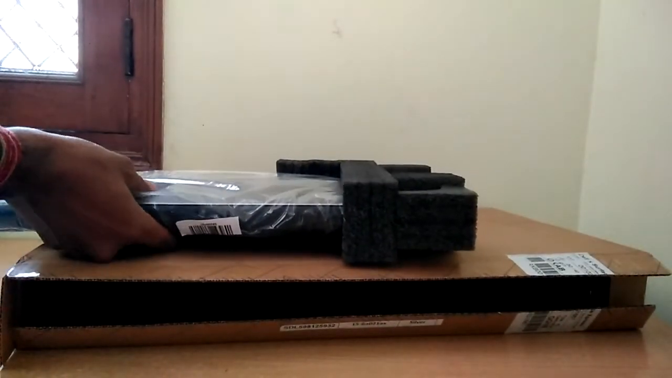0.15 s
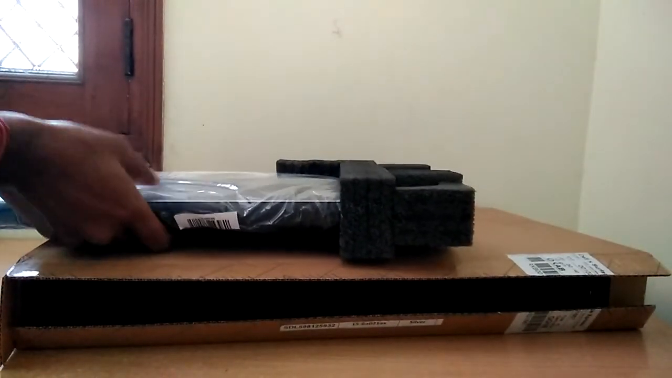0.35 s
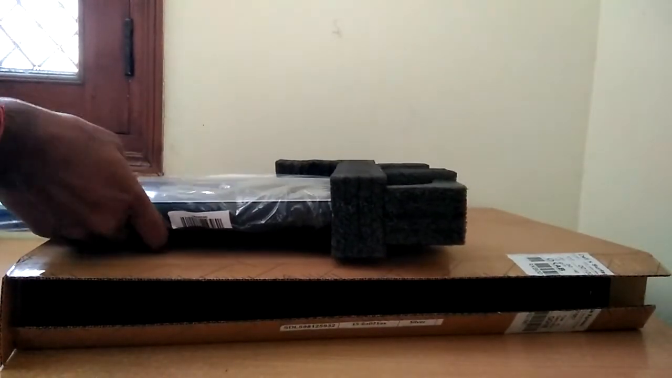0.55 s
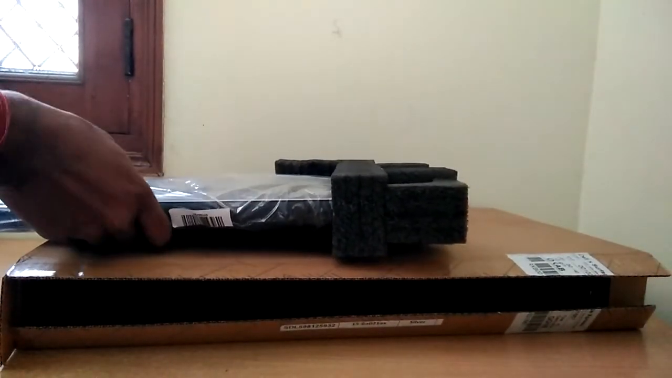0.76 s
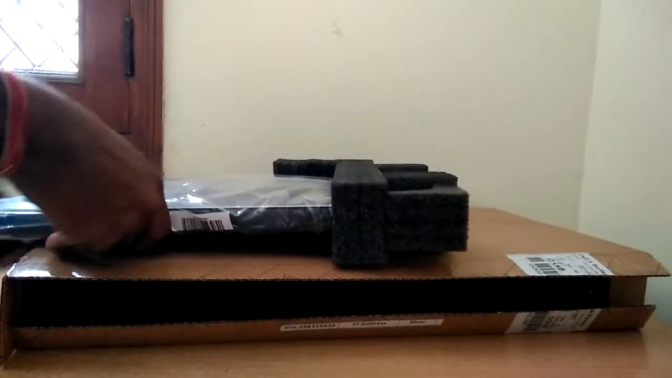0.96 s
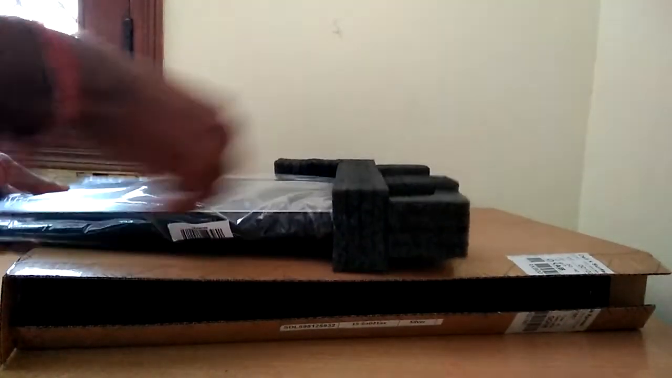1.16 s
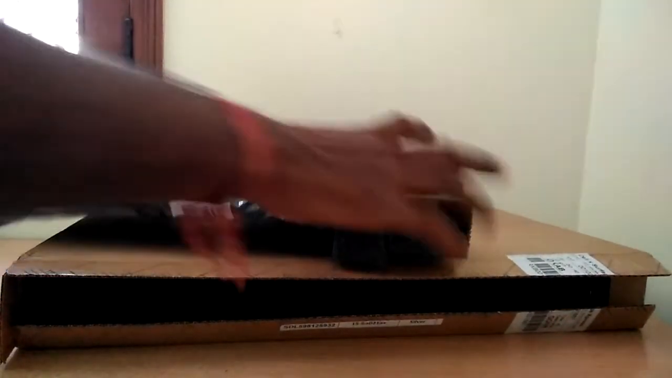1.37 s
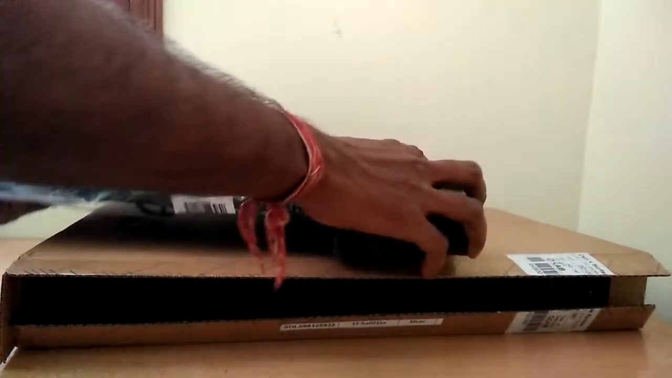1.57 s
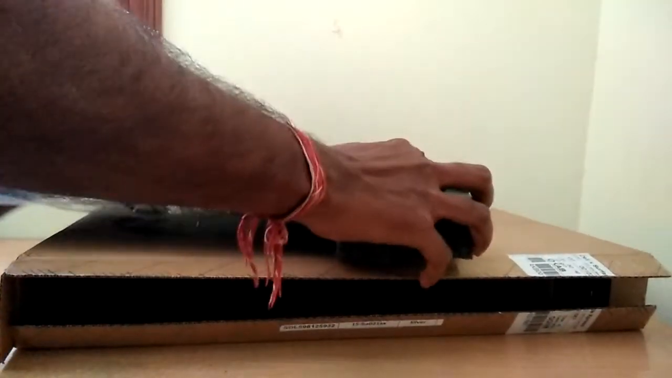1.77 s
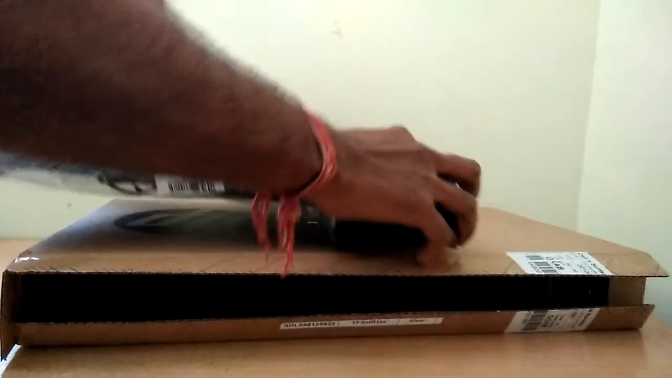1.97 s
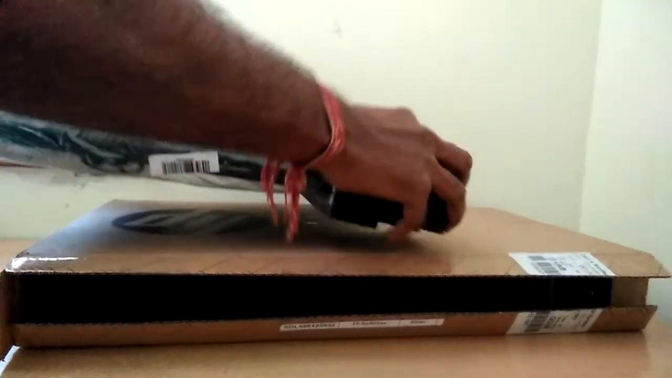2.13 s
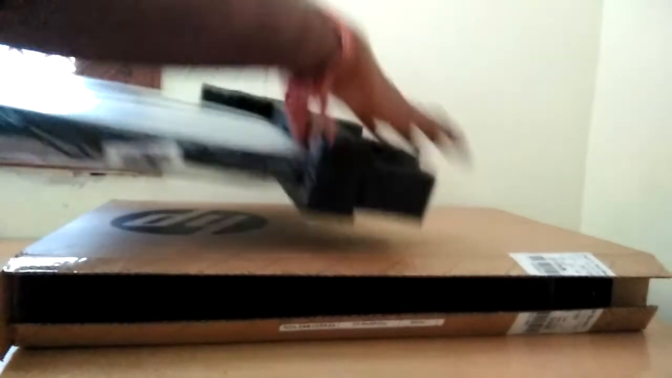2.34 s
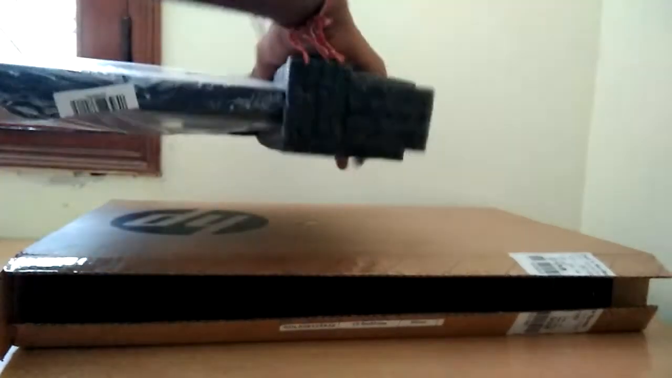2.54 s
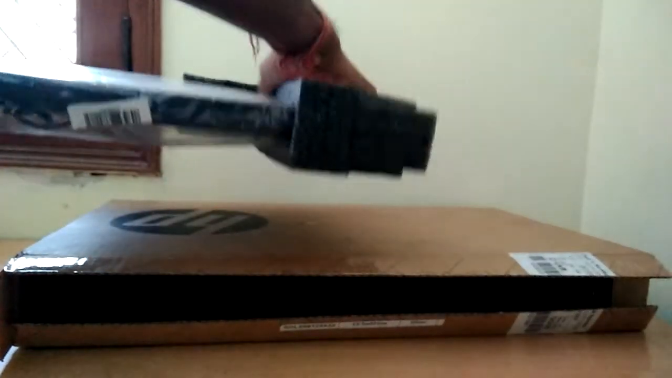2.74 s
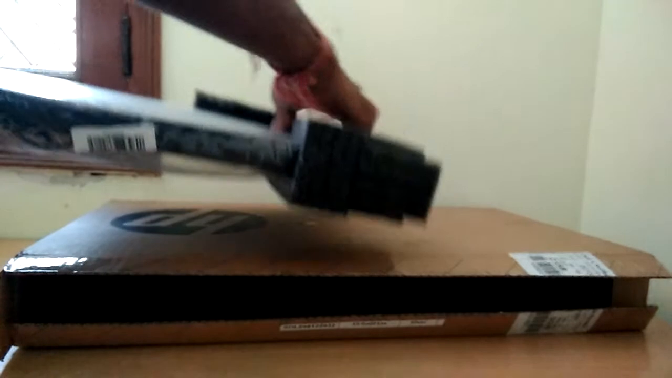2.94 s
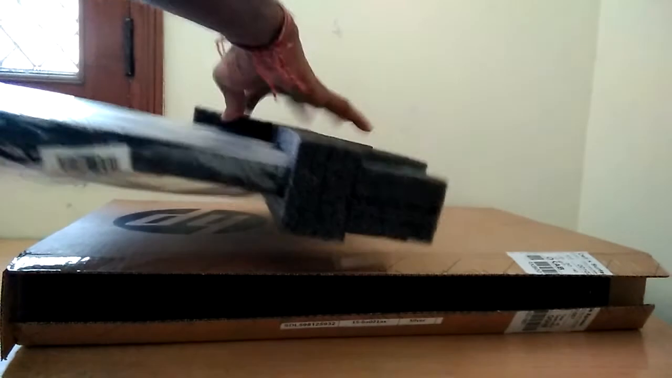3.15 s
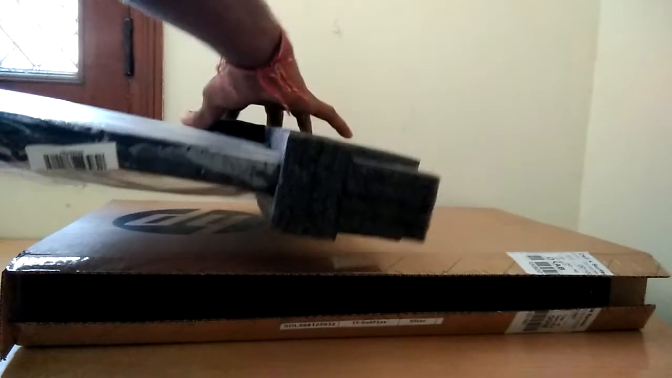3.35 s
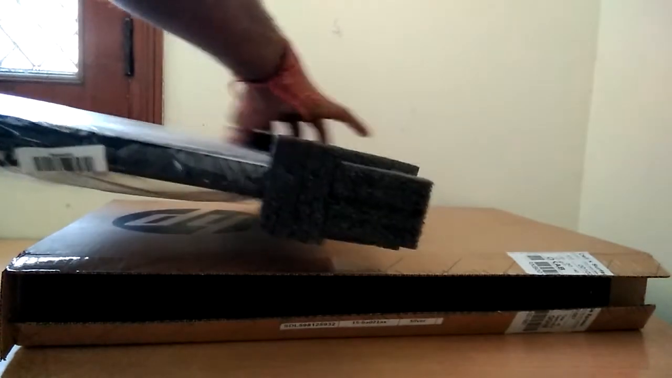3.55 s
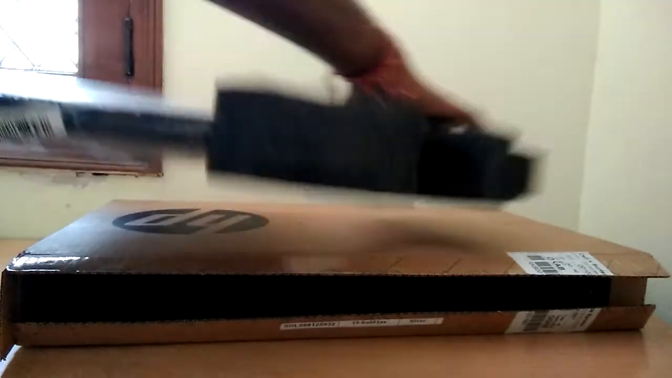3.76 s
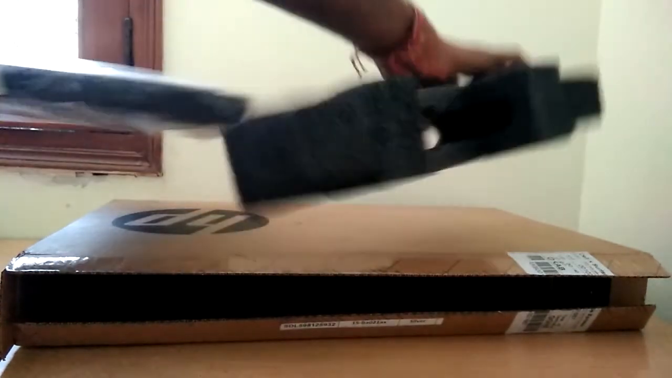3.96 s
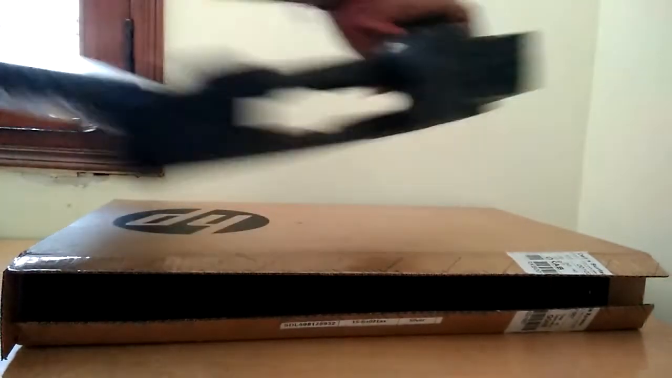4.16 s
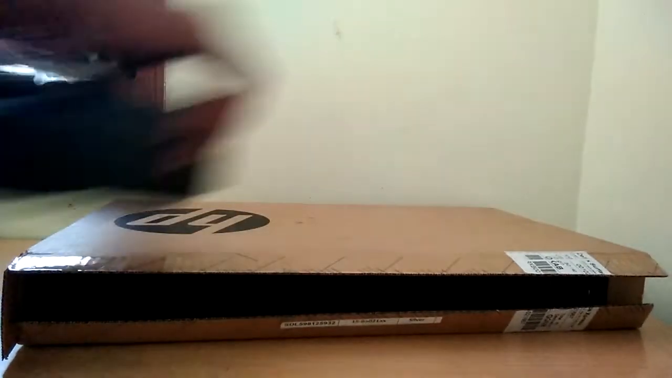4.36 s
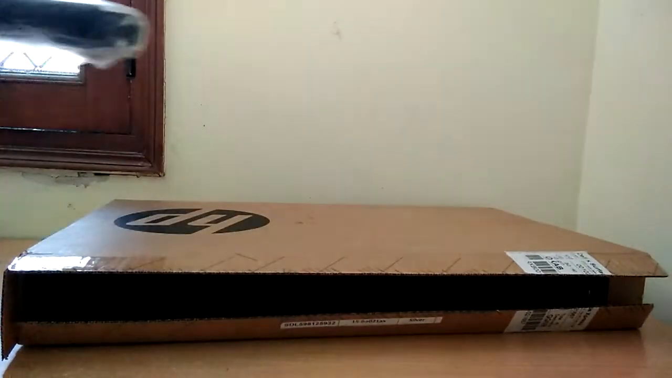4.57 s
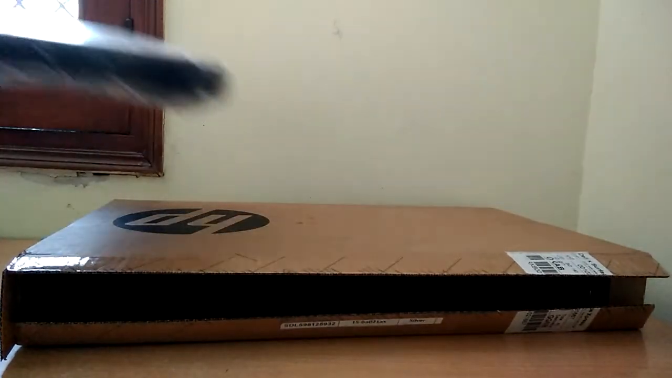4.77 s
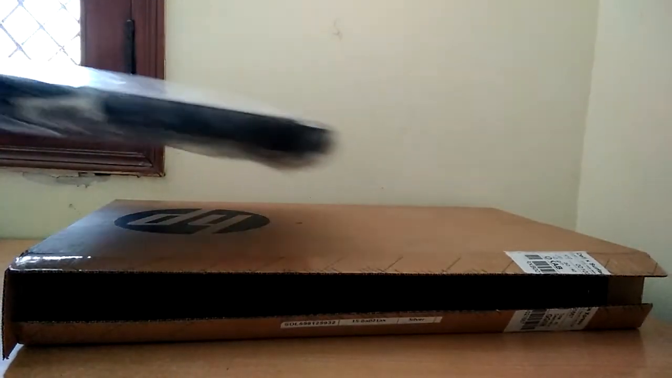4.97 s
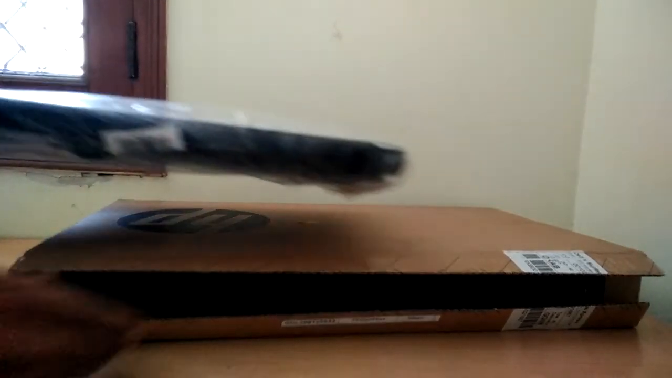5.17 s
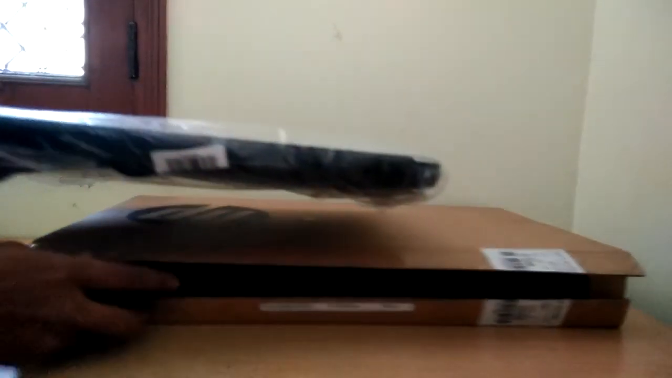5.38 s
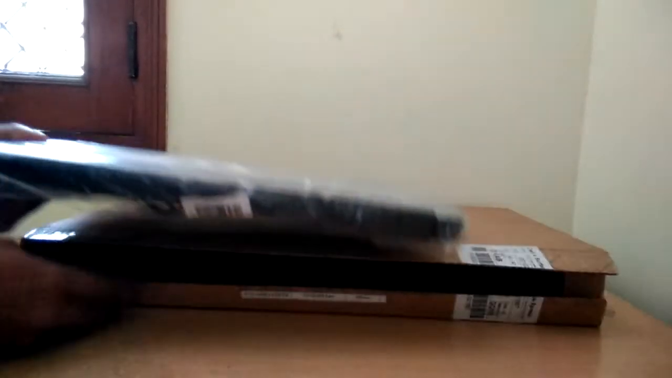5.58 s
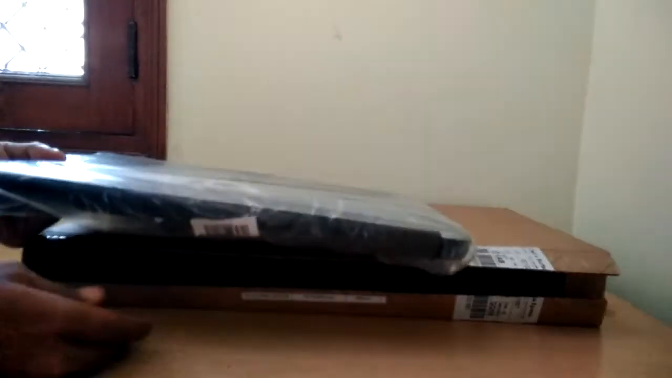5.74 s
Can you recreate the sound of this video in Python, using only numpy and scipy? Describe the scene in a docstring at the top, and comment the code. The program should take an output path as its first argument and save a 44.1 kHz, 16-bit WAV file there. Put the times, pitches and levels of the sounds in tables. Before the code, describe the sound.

Close indoor unpacking: irregular plastic rustling, sharp crease clicks, rough foam slips, soft cardboard bumps, and a hollow thump near the end.

```python
"""Unpacking a sleeved device

A flat device in a plastic sleeve is handled on its cardboard box in a small room, over a faint hush.
Film and foam rub by stick-slip friction, modelled as clumped noise grains; buckling creases snap and ring.
Taps excite the lid's resonances, brushes are dulled friction noise, and the shifting load rumbles.
A foam end cap scrapes off in short slips, the freed shell rings faintly as filtered noise,
and at last the device is set down with a thud, a sum of decaying modes of the hollow box."""
import sys
import numpy as np
from scipy import signal
from scipy.fft import rfft, irfft, next_fast_len
from scipy.io import wavfile
from scipy.ndimage import uniform_filter1d, map_coordinates

SR = 44100
rng = np.random.default_rng(int(sys.argv[2]) if len(sys.argv) > 2 else 0)


def log_audio(samples):
    """Write samples as a 16-bit WAV file to the path given in sys.argv[1]."""
    # one column per channel
    frames = np.atleast_2d(samples).T
    # limit to full scale, then quantise
    limited = np.clip(frames, -1, 1)
    pcm = np.round(limited * 32767).astype(np.int16)
    wavfile.write(sys.argv[1], SR, pcm)


N = 256220
TOP_HZ = 14500  # upper band limit

# Levels in the tables are relative: the layers apply their own gains as well.
# background hush: (frequency [Hz], spectral level [dB])
HUSH_SPECTRUM = [(20, -7), (60, 22), (150, 6.5), (400, -16.5), (1000, -5.5), (3000, -72), (6000, -55.5),
                 (14000, -14.5)]
# decay of the room's diffuse tail: (frequency [Hz], T60 [s])
ROOM_DECAY = [(100, 0.5), (500, 0.87), (2000, 0.52), (6000, 0.18), (14000, 0.54)]
# stereo width, gain of the side signal: (frequency [Hz], gain [dB])
SIDE_GAIN = [(2800, -71), (4000, -53), (5500, -24), (7500, -5.5), (10000, -4), (14000, -4.5)]

# the load is shoved across the box and judders: (time [s], length [s], level [dB])
SHOVES = [(0, .01, -41.5), (0.232, 0.087, -43), (0.396, 0.21, -44), (1.05, 0.26, -43.5),
          (1.395, 0.047, -45), (1.707, 0.035, -44), (2.18, 0.048, -42), (3.584, 0.062, -47),
          (4.06, .15, -47.5), (4.85, 0.084, -39.5), (5.02, 0.05, -37.5), (5.317, 0.053, -41),
          (5.438, 0.3, -48)]
# juddering of the load: (frequency [Hz], spectral level [dB])
RUMBLE_SPECTRUM = [(20, -46), (35, -8), (52, -0.5), (85, 4), (120, 2.5), (165, -4), (230, -4.5), (320, -13),
                   (600, -27), (1500, -42)]
SHOVE_RISE_S, SHOVE_T60_S = 0.021, 0.39
CARRY_DB = -53  # merely holding the load, on the scale of the shoves

# the load bumps the hollow box: (time [s], boom level [dB], contact level [dB], firmness [Hz])
BUMPS = [(.236, -17.5, -66, 70), (1.151, -24.5, -42, 140), (1.725, -44, -48.5, 72), (2.186, -43, -57, 70),
         (3.683, -44, -36, 250), (4.198, -33, -64, 70), (4.312, -19, -67, 60), (5.609, -9, -23, 490),
         (5.672, -33, -34.5, 400), (5.777, -22.5, -45, 200)]
# modes of the box on its table: (frequency [Hz], level [dB], T60 [s])
BOX_MODES = [(60, -15, .25), (89, -11, 0.32), (116, -5.5, 0.28), (140, -12, 0.54), (179.8, -12, 0.42),
             (227, -15, 0.34), (281, -19.5, 0.73), (402.7, -22, 0.38)]
# crushing noise of the contact: (frequency [Hz], spectral level [dB])
CONTACT_SPECTRUM = [(40, -15), (90, -9.5), (170, 14), (400, -1.5), (900, -3.5), (1600, -13), (3500, -15),
                    (8000, -30), (14000, -32)]

# fingers and corners tap the lid: (time [s], level [dB], pitch of the spot over the lid's own [ratio])
TAPS = [(0.487, -33, 0.86), (0.521, -31.5, 1.05), (0.625, -29.5, 1.07), (1.412, -25.5, 0.97),
        (1.84, -31, 0.88), (2.184, -36, 1.14), (2.8, -39, 1.8)]
# resonances of the lid: (frequency [Hz], width [Hz], level [dB])
LID_MODES = [(400, 100, 3.5), (786, 380, -2), (1170, 180, -1.5), (1580, 330, -16.5)]

# hands and corners brush the cardboard: (time [s], length [s], level [dB], dull above [Hz])
BRUSHES = [(0.231, 0.018, -38.5, 6000), (0.728, 0.36, -54, 1210), (1.139, 0.0071, -46, 3000),
           (1.145, 0.13, -43.5, 400), (1.952, 0.073, -45, 900), (2.189, 0.049, -47, 900),
           (2.988, .01, -51, 700), (4.83, 0.034, -41.5, 7000), (5.321, 0.0066, -41, 6000)]
# friction on cardboard: (frequency [Hz], spectral level [dB])
CARDBOARD_SPECTRUM = [(150, -8.5), (300, 1.5), (900, 0.5), (1700, -1), (2600, -8), (5000, -9.5),
                      (14000, -38)]

# resonances of the device's thin shell: (frequency [Hz], width [Hz], level [dB])
SHELL_MODES = [(1160, 73, -16.5), (1946, 140, 17), (3440, 90, 6)]
FREED_S = 4.24  # the shell is free of the foam

# creases in the film snap through: (time [s], level [dB], ring pitch [Hz], extra top end [dB])
SNAPS = [(0.156, -23.5, 5360, -6.5), (0.4703, -26, 5860, -2), (0.6036, -23.5, 6150, -1),
         (0.643, -27.5, 6000, 3), (0.7583, -31, 5870, 6), (0.8456, -25.5, 5860, -5),
         (0.883, -20.5, 5800, 3.5), (0.9413, -19, 5830, 2.5), (1.182, -26.5, 6330, -0.5),
         (1.2214, -25.5, 5770, -4), (1.309, -22.5, 5500, 1), (1.4115, -21, 6050, 5),
         (1.4266, -25, 5600, -2), (1.564, -24, 5540, -1), (2.177, -23.5, 5800, -8),
         (2.3085, -25.5, 5850, -4), (2.417, -25, 5700, 1.5), (3.0665, -17, 4750, 1),
         (3.14, -15.5, 5830, -3), (3.2641, -22.5, 4400, 0), (3.8996, -20.5, 5110, -1),
         (4.0698, -22.5, 6060, 4), (4.1944, -20, 5600, -1), (4.239, -24.5, 4970, -1.5),
         (4.8302, -20.5, 6010, -7), (5.4887, -24, 5700, 6)]
# a buckling crease: (frequency [Hz], spectral level [dB])
CRACK_SPECTRUM = [(1000, -23), (3200, -14), (4600, 3), (5800, 8.5), (8000, -8), (14000, -16)]
CRACK_HZ = 5630  # ring pitch of a crease of middling size
TOP_END_HZ = 7500  # crack spectrum points above this, before pitch scaling, take the extra top end
# the film settles after each snap; level relative to the snap's listed level
FLURRY_DB, FLURRY_RISE_S, FLURRY_T60_S = -26.5, 0.004, 0.37

# quick slips of foam over film: (time [s], rise [s], T60 [s], film level [dB], foam level [dB])
SLIPS = [(0.417, 0.0039, 0.07, -36.5, -60), (0.577, .008, 0.11, -40, -48),
         (1.344, 0.016, 0.14, -34.5, -38.5), (2.49, 0.0082, 0.065, -30, -43),
         (2.565, 0.0077, 0.2, -29, -41), (3.207, 0.0061, 0.14, -34, -43.5), (3.298, 0.01, 0.13, -50, -37.5),
         (3.322, 0.014, 0.092, -37, -45), (3.69, 0.0023, 0.07, -20.5, -29),
         (4.18, 0.016, 0.044, -34, -46.5), (4.236, 0.0066, 0.014, -26, -38),
         (4.248, 0.0033, 0.025, -29.5, -34), (4.307, 0.011, 0.065, -37, -38),
         (4.614, 0.019, 0.039, -28.5, -38), (4.658, 0.0135, 0.087, -35.5, -43),
         (4.826, 0.003, 0.068, -32.5, -29), (4.914, 0.0044, 0.095, -34, -45.5),
         (4.952, 0.0038, 0.042, -48, -36.5), (5.316, 0.0099, 0.096, -31.5, -37.5)]
# film and foam are dragged steadily: (time [s], rise [s], length [s], film level [dB], foam level [dB])
DRAGS = [(0, 0.0024, .02, -49, -59.5), (0.156, .01, 0.11, -54, -57.5), (0.354, .008, 0.17, -46, -53.5),
         (0.823, 0.017, 0.16, -44.5, -63), (1.062, 0.033, 0.047, -42, -49),
         (1.496, 0.013, 0.066, -38.5, -49), (1.65, 0.018, 0.079, -48, -50.5), (1.791, 0.18, 0.27, -35, -41),
         (2.17, 0.0089, 0.19, -43, -54), (2.366, 0.15, 0.25, -38, -44), (2.717, 0.017, 0.18, -47.5, -51.5),
         (2.924, 0.018, 0.058, -41, -47), (3.34, 0.029, 0.096, -50, -55), (3.444, 0.08, 0.25, -42.5, -52.5),
         (3.624, 0.059, 0.087, -29, -30.5), (3.72, 0.066, 0.28, -38.5, -42),
         (4.142, 0.0465, 0.19, -44.5, -51.5), (4.445, 0.022, 0.034, -56.5, -68),
         (4.621, 0.027, 0.13, -40, -44.5), (4.807, 0.016, 0.15, -46, -39), (4.995, .02, 0.037, -54, -49.5),
         (5.341, 0.034, 0.27, -40, -43.5), (5.739, 0.025, 0.051, -47.5, -53.5)]
DRAG_T60_S = 0.37  # a drag dies away once the hand stops
# while the foam cap is on, the gripped sleeve never quite rests
GRIP_FROM_S, GRIP_TO_S, GRIP_RISE_S, GRIP_T60_S = 0.14, 4.03, 0.3, 0.2
GRIP_FILM_DB, GRIP_FOAM_DB = -50.5, -55
# rubbing film: (frequency [Hz], spectral level [dB])
FILM_SPECTRUM = [(1200, -38.5), (2000, -19.5), (3000, -9), (4100, -0.5), (4700, -2), (5400, 3.5), (6100, 1),
                 (7000, -8), (8000, -12.5), (10000, -16.5), (14500, -21)]
# rubbing foam: (frequency [Hz], spectral level [dB])
FOAM_SPECTRUM = [(120, -19.5), (300, -0.5), (700, 3), (1200, 4.5), (1480, 0), (1800, 5.5), (2700, 6),
                 (4000, 5), (5500, 0.5), (8000, -23), (14000, -26.5)]
# the film's treble, higher when it is taut: (time [s], level [dB])
TAUTNESS = [(0, 3.5), (1.5, 4.5), (2.6, 1.5), (4.07, 2), (4.7, -0.5), (5.32, 6.5), (5.42, -1.5),
            (5.62, 2.5)]


def amp(db):
    """Level to amplitude ratio: 20 dB is a factor of ten."""
    return 10 ** (np.asarray(db) / 20)


def unit(x):
    """Power normalization: scale to rms 1."""
    return x / np.sqrt(np.mean(x ** 2) + 1e-20)


def along(points, hz):
    """Interpolation of (frequency [Hz], value) points on a logarithmic axis."""
    f, v = np.transpose(points)
    return np.interp(np.log(hz + 1), np.log(f + 1), v)


def curves(rows):
    """Linear interpolation in time: one value per sample for each column after the time."""
    s, *cols = np.transpose(rows)
    return [np.interp(np.arange(N) / SR, s, c) for c in cols]


def wobble(rate):
    """Slow random modulation: a smooth curve through rate random knots a second."""
    knots = rng.standard_normal(int(N * rate / SR) + 4)
    return map_coordinates(knots, [np.arange(N) * rate / SR])


def fade(t, t60):
    """Exponential decay from t = 0, by 60 dB in t60 seconds."""
    return np.exp(-np.log(1000) * np.maximum(t, 0) / t60)


def stroke(s, rise, length, t60):
    """Envelope of one movement: it builds up, holds until its length is over, then dies away."""
    t = np.arange(N) / SR - s
    return np.clip(t / rise, 0, 1) * fade(t - length, t60)


def add(track, s, sound):
    """Superposition: mix a sound into the track at time s."""
    part = track[round(s * SR):][:len(sound)]
    part += sound[:len(part)]


def filtered(x, response):
    """Linear filtering: the spectrum of x times a complex response of frequency."""
    n = x.shape[-1]
    padded = 2 * next_fast_len(n // 2 + SR // 10)
    hz = np.fft.rfftfreq(padded, 1 / SR)
    return irfft(rfft(x, padded) * response(hz), padded)[..., :n]


def coloured(x, spectrum):
    """Minimum-phase, hence causal, filtering to a (frequency [Hz], level [dB]) shape."""
    def response(hz):
        cepstrum = irfft(np.log(amp(along(spectrum, hz))))
        half = len(cepstrum) // 2
        # folding the cepstrum onto positive times gives minimum phase
        cepstrum[1:half] *= 2
        cepstrum[half + 1:] = 0
        return np.exp(rfft(cepstrum))
    return filtered(x, response)


def resonate(x, modes):
    """Modal response: parallel second-order resonances of alternating sign."""
    def response(f):
        total = 0
        for k, (centre, width, db) in enumerate(modes):
            damping = 1j * f * width
            total = total + (-1) ** k * amp(db) * damping / (centre * centre - f * f + damping)
        return total
    return filtered(x, response)


def grains(spectrum, rate, spread_db, smooth, clump_db):
    """Stick-slip friction: tiny releases of uneven size over a smooth hiss, in clumps; rms 1."""
    sizes = amp(spread_db * np.clip(rng.standard_normal(N), -2, 2)) * rng.choice([-1, 1], N)
    releases = unit(sizes * (rng.random(N) < rate / SR))
    clumps = amp(clump_db * (wobble(45) + wobble(170)))
    hiss = smooth * rng.standard_normal(N)
    return unit(coloured(clumps * (releases + hiss), spectrum))


def hush(level_db=-60):
    """Stationary noise: the faint, steady background of the room."""
    return amp(level_db) * unit(coloured(rng.standard_normal(N), HUSH_SPECTRUM))


def room(x, wall_db=-9, wall_t60=0.018, tail_db=-10):
    """Reverberation: table and near walls answer after 2 ms, with a longer diffuse tail."""
    hz, t, z = signal.stft(rng.standard_normal((2, SR // 2)), SR, nperseg=256)
    tail = signal.istft(z[0] * fade(t, along(ROOM_DECAY, hz)[:, None]), SR, nperseg=256)[1]
    walls = signal.istft(z[1] * fade(t, wall_t60), SR, nperseg=256)[1]
    answer = amp(tail_db) * tail / np.linalg.norm(tail)
    answer = answer + amp(wall_db) * walls / np.linalg.norm(walls)
    delayed = np.pad(answer, (SR // 500, 0))
    return x + signal.fftconvolve(x, delayed)[:N]


def stereo_width(centre, separate):
    """Stereo width: the centre is shared; separate treble is added on one side, subtracted on the other."""
    side = filtered(separate, lambda hz: amp(along(SIDE_GAIN, hz)))
    return np.array([centre + side, centre - side])


def rumble(level_db=-1.5, unsteady_db=2):
    """Low-frequency friction: the load judders, faintly while held and more with each shove."""
    power = amp(CARRY_DB + unsteady_db * wobble(12)) ** 2
    for s, length, db in SHOVES:
        power += (amp(db) * stroke(s, SHOVE_RISE_S, length, SHOVE_T60_S)) ** 2
    judder = grains(RUMBLE_SPECTRUM, rate=340, spread_db=2.5, smooth=1.0, clump_db=-2.0)
    return amp(level_db) * np.sqrt(power) * judder


def bumps(attack=0.001, contact_t60=0.23):
    """Impact excitation of box modes: a firm contact drives them all, a soft one only the lowest."""
    track, t = np.zeros(N), np.arange(SR // 2) / SR
    for s, db, contact_db, firm_hz in BUMPS:
        boom = np.zeros(len(t))
        for hz, level, t60 in BOX_MODES:
            drive = amp(level) / (1 + (hz / firm_hz) ** 4)
            boom += drive * np.sin(2 * np.pi * hz * t) * fade(t, t60)
        crush = unit(coloured(rng.standard_normal(len(t)), CONTACT_SPECTRUM)) * fade(t, contact_t60)
        onset = 1 - np.exp(-t / attack)
        add(track, s, (amp(db) * boom + amp(contact_db) * crush) * onset)
    return track


def taps(level_db=3, rattle=0.046, t60=0.15):
    """Impulse response: a tap and its brief buzz excite the damped lid at the pitch of that spot."""
    track, t = np.zeros(N), np.arange(SR // 5) / SR
    for s, db, pitch in TAPS:
        modes = [(hz * pitch, width, level) for hz, width, level in LID_MODES]
        buzz = rattle * rng.standard_normal(len(t)) * fade(t, t60)
        knock = resonate((t == 0) + buzz, modes)
        add(track, s, amp(db + level_db) * knock / np.abs(knock).max())
    return track


def brushes(rise=0.0066, t60=0.27):
    """Dry friction on the cardboard lid: the softer the touch, the lower its cutoff."""
    track = np.zeros(N)
    friction = grains(CARDBOARD_SPECTRUM, rate=500, spread_db=3.5, smooth=1.0, clump_db=0.9)
    for s, length, db, dull_hz in BRUSHES:
        brush = amp(db) * stroke(s, rise, length, t60) * friction
        track += filtered(brush, lambda hz: 1 / np.sqrt(1 + (hz / dull_hz) ** 4))
    return track


def shell(level_db=-42, t60=0.47):
    """Damped resonance: the thin shell rings faintly after the end cap slips off."""
    track, t = np.zeros(N), np.arange(SR // 2) / SR
    ring = unit(resonate(rng.standard_normal(len(t)), SHELL_MODES))
    add(track, FREED_S, amp(level_db) * ring * fade(t, t60))
    return track


def crinkles(pitch_hz=5600, scatter=0.204, rate=260, cycles=6, spread_db=4):
    """Snap-through of small film facets, each ringing at its own pitch; rms 1."""
    draws = rng.standard_normal((2400, 2))
    starts = (np.cumsum(rng.exponential(1, len(draws))) / rate * SR).astype(int)
    hz = np.clip(pitch_hz * np.exp(scatter * draws[:, :1]), 0, TOP_HZ)
    k = np.arange(SR // 125)  # samples of one 8 ms ping
    turns = hz * k / SR
    sizes = amp(spread_db * np.clip(draws[:, 1:], -2, 2))
    pings = sizes * np.sin(2 * np.pi * turns) * turns * np.exp(-2 * turns / cycles)
    places = (starts[:, None] + k).ravel()
    return unit(np.bincount(places, pings.ravel(), N)[:N])


def ticks(rate=45, spread_db=7.0):
    """Random impulses: single tiny creases give way, each a sharp click; rms 1."""
    sizes = amp(spread_db * np.clip(rng.standard_normal(N), -2, 1.5)) * rng.choice([-1, 1], N)
    return unit(coloured(sizes * (rng.random(N) < rate / SR), CRACK_SPECTRUM))


def patchy(x, depth_db):
    """Time-varying colour: each moving fold has its own for a few hundredths of a second; rms 1."""
    z = signal.stft(x, nperseg=256)[2]
    field = uniform_filter1d(rng.standard_normal(z.shape), size=6, axis=0)  # across frequency
    field = uniform_filter1d(field, size=7, axis=1)  # across time
    return unit(signal.istft(z * amp(depth_db * unit(field)), nperseg=256)[1][:N])


def rubbing(film_db=-2, foam_db=-3.5, crinkle_db=-7, tick_db=-7, catch_db=1.0):
    """Sliding friction of film and foam: grip, drags and flurries add in power, slips in amplitude."""
    grip = stroke(GRIP_FROM_S, GRIP_RISE_S, GRIP_TO_S - GRIP_FROM_S, GRIP_T60_S)
    film_power, foam_power = (amp(GRIP_FILM_DB) * grip) ** 2, (amp(GRIP_FOAM_DB) * grip) ** 2
    for s, rise, length, drag_film_db, drag_foam_db in DRAGS:
        drag = stroke(s, rise, length, DRAG_T60_S)
        film_power += (amp(drag_film_db) * drag) ** 2
        foam_power += (amp(drag_foam_db) * drag) ** 2
    t = np.arange(SR // 4) / SR  # flurries and slips are cut off after 0.25 s
    flurry = np.minimum(t / FLURRY_RISE_S, 1) * fade(t, FLURRY_T60_S)
    for s, db, *_ in SNAPS:
        add(film_power, s, (amp(db + FLURRY_DB) * flurry) ** 2)

    catching = catch_db * wobble(28)  # uneven catching, shared by both surfaces
    film = np.sqrt(film_power) * amp(film_db + catching)
    foam = np.sqrt(foam_power) * amp(foam_db + catching)
    # the crackle follows the film before the slips are added
    facets = crinkles(pitch_hz=5770, scatter=0.13, rate=150, cycles=5.6, spread_db=-2)
    crackle = film * (amp(crinkle_db) * facets + amp(tick_db) * ticks())
    for s, rise, t60, slip_film_db, slip_foam_db in SLIPS:
        swell = np.minimum(t / rise, 1) * fade(t - rise, t60)
        add(film, s, amp(slip_film_db) * swell)
        add(foam, s, amp(slip_foam_db) * swell)

    rustle = grains(FILM_SPECTRUM, rate=2200, spread_db=1.5, smooth=0.88, clump_db=1.27)
    scrape = grains(FOAM_SPECTRUM, rate=1700, spread_db=3.5, smooth=0.95, clump_db=0.92)
    return film * patchy(rustle, depth_db=2.0) + foam * patchy(scrape, depth_db=4.0) + crackle


def snaps(level_db=0, crack_t60=0.0063, ring_t60=0.0082, ring_db=-2):
    """Buckling instability: a crease cracks and rings briefly, its spectrum scaled with its pitch."""
    track, t = np.zeros(N), np.arange(SR // 30) / SR
    for s, db, hz, top_db in SNAPS:
        colour = [(f * hz / CRACK_HZ, level + top_db * (f > TOP_END_HZ)) for f, level in CRACK_SPECTRUM]
        burst = rng.choice([-1, 1], len(t)) * fade(t, crack_t60)
        crack = unit(coloured(burst, colour))
        ping = unit(np.sin(2 * np.pi * hz * t) * t * fade(t, ring_t60))
        # -20.5 dB takes the listed level to the rms over the whole snap
        add(track, s, amp(db + level_db - 20.5) * unit(crack + amp(ring_db) * ping))
    return track


def tautness(sound, sparkle_hz=7500, slack_hz=3700, slack_width_hz=800, slack_share=0.97):
    """Tension and spectral balance: taut film gains top end, slack film crinkles lower."""
    taut_db, = curves(TAUTNESS)
    treble = filtered(sound, lambda hz: 1 - 1 / (1 + (hz / sparkle_hz) ** 12))
    slack = filtered(sound, lambda hz: np.exp(-((hz - slack_hz) / slack_width_hz) ** 2))
    treble_change = amp(taut_db + 0.3 * wobble(47)) - 1  # the treble also flickers slightly
    slack_change = amp(-slack_share * taut_db) - 1
    return sound + treble_change * treble + slack_change * slack


def wrapping():
    """Friction and buckling of film and foam, coloured by how taut the sleeve is."""
    return tautness(rubbing() + snaps())


def scene():
    """Superposition of reverberant handling, dry box sounds and hush, widened to stereo."""
    handling = room(wrapping() + taps() + brushes() + shell())
    centre = hush() + rumble() + bumps() + handling
    # the same movements with separately drawn random grains
    separate = room(wrapping())
    return stereo_width(centre, separate)


def record(dry, low_cut_hz=49):
    """Band limitation: the deepest bass is attenuated and nothing is kept from TOP_HZ upwards."""
    high_pass = signal.butter(4, low_cut_hz, "high", fs=SR, output="sos")
    return filtered(signal.sosfilt(high_pass, dry), lambda hz: hz < TOP_HZ)


dry = scene()
out = record(dry)
log_audio(out)
```